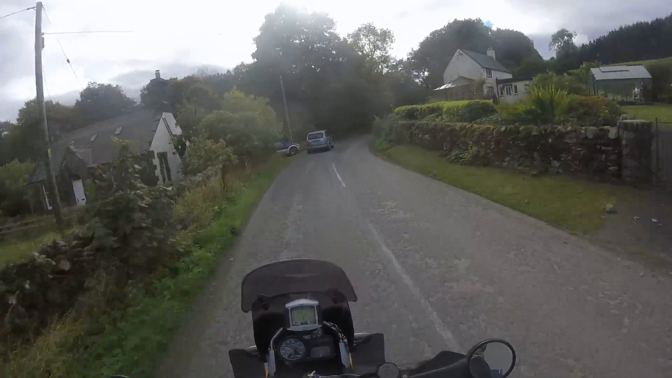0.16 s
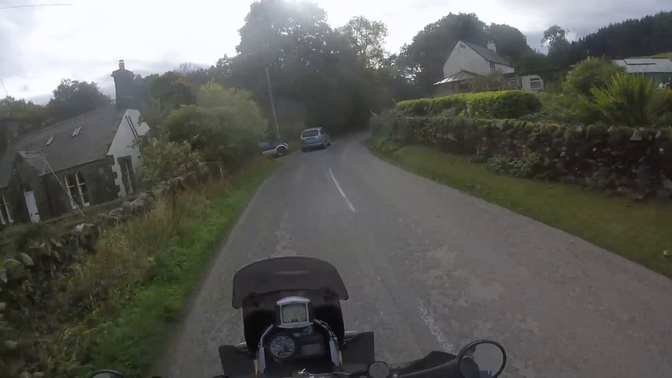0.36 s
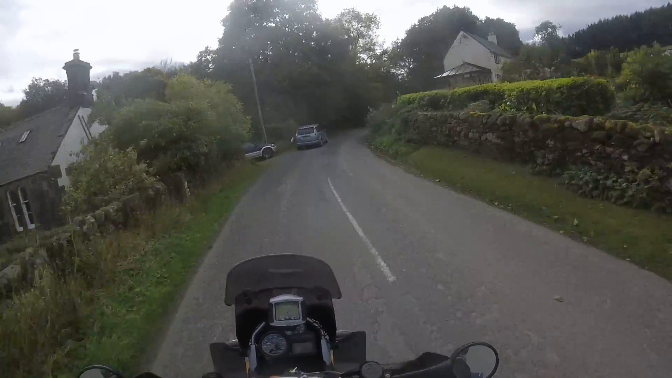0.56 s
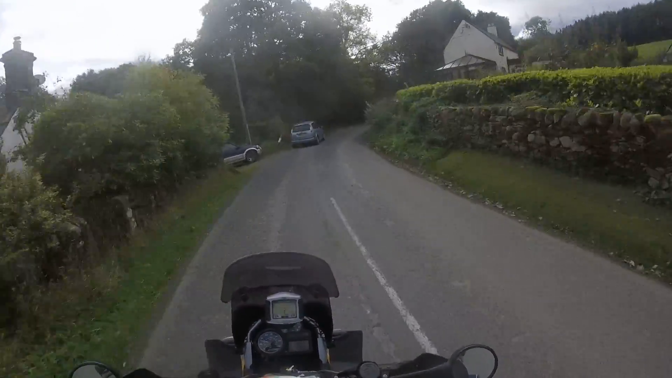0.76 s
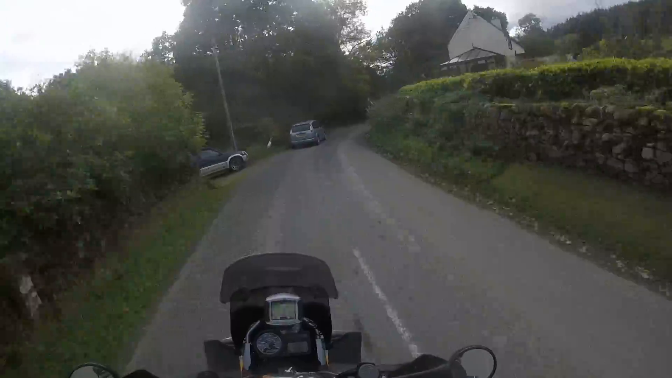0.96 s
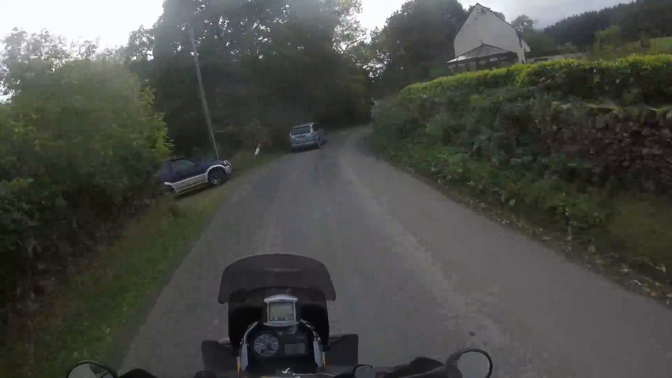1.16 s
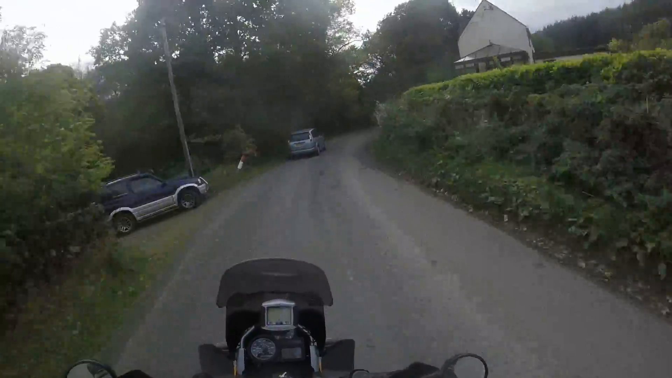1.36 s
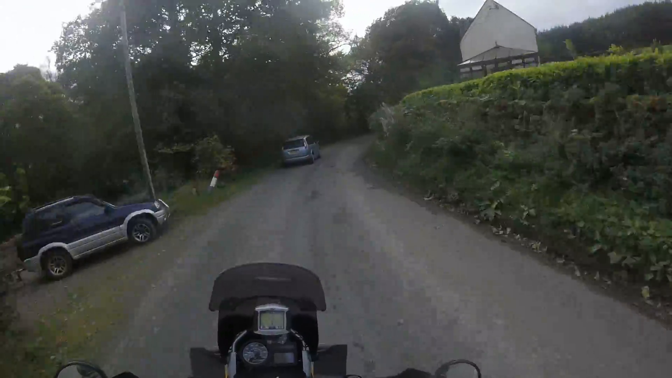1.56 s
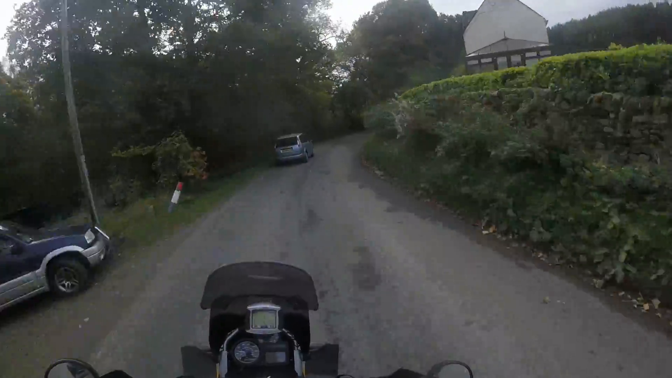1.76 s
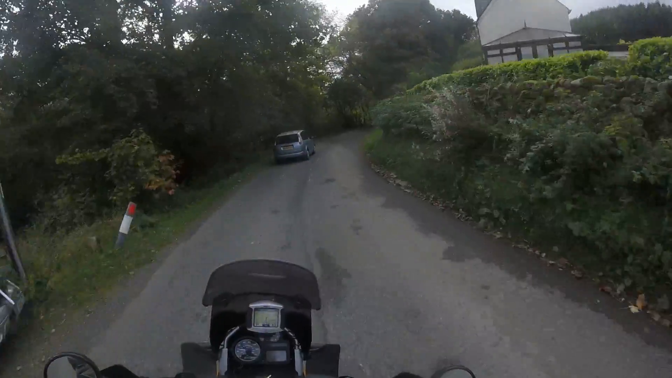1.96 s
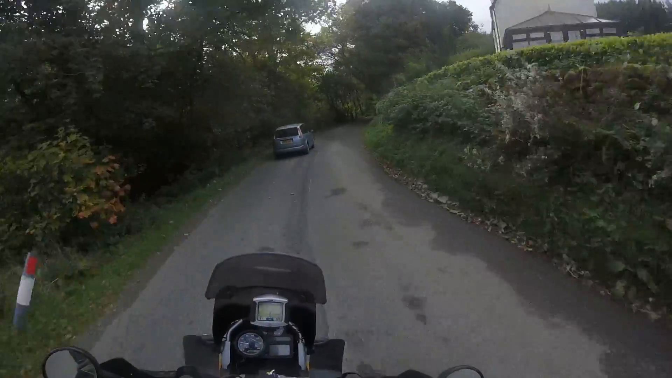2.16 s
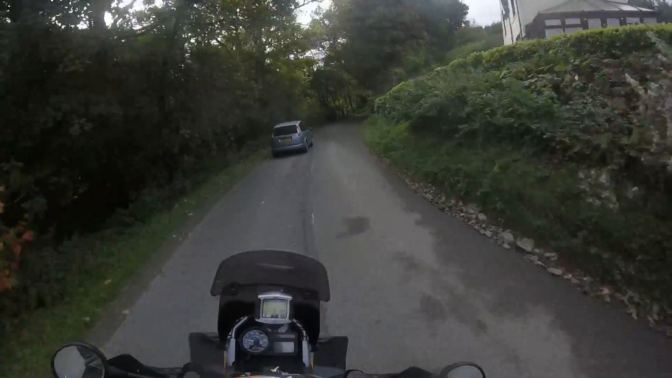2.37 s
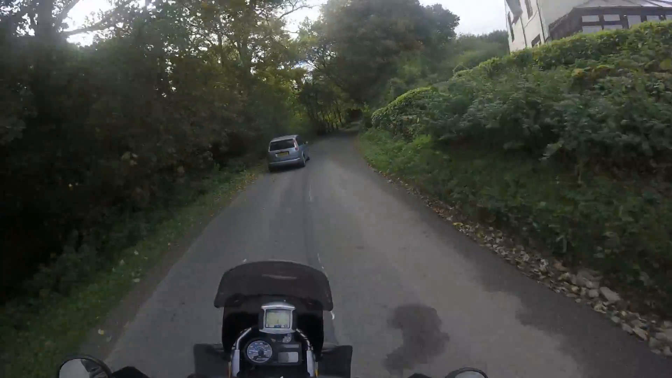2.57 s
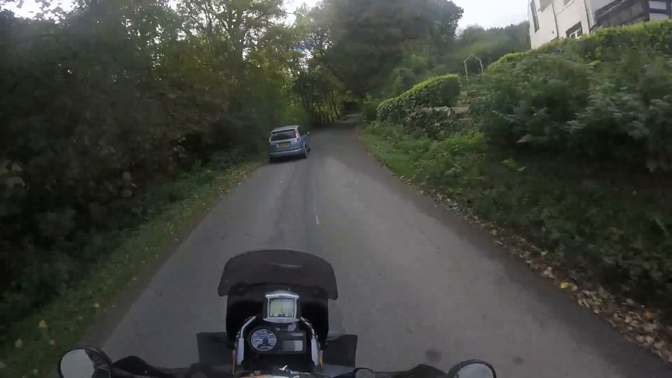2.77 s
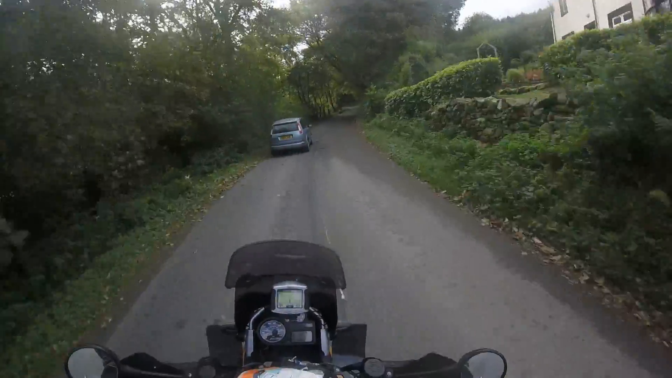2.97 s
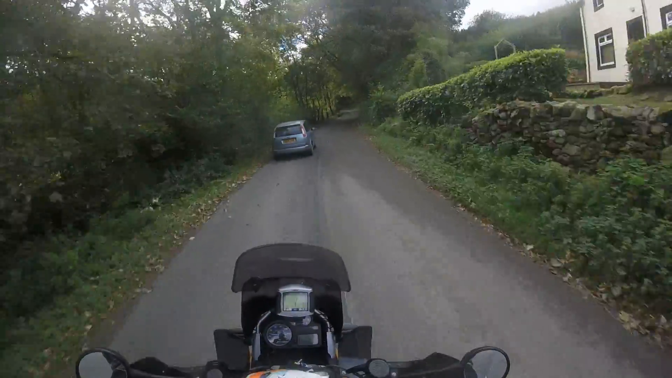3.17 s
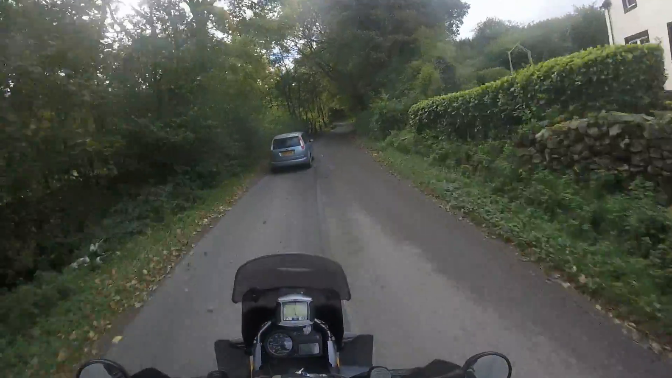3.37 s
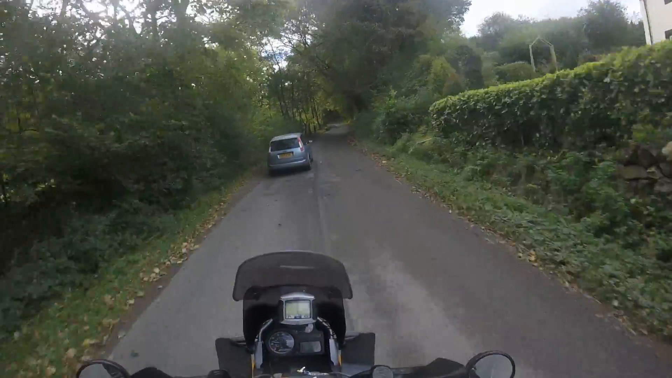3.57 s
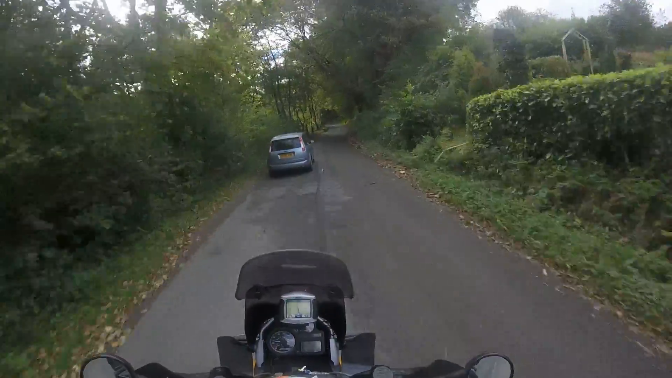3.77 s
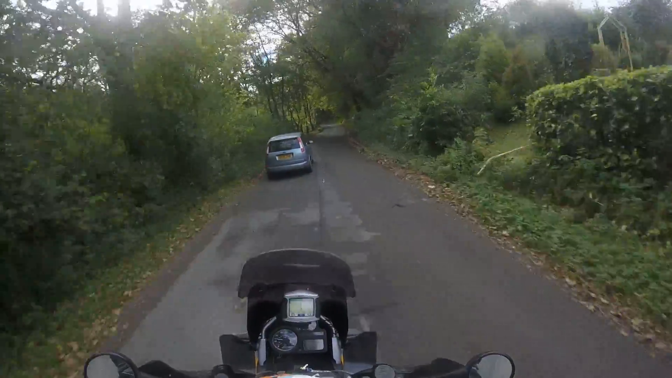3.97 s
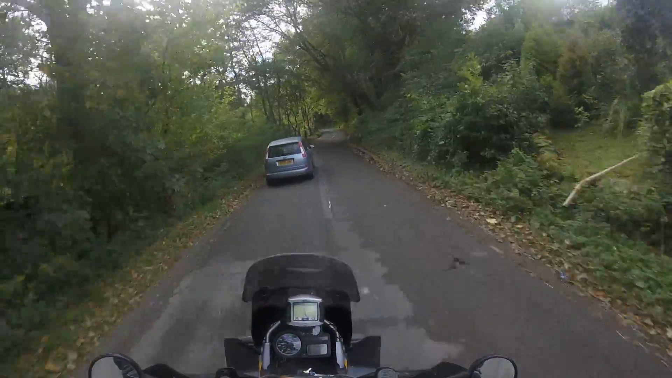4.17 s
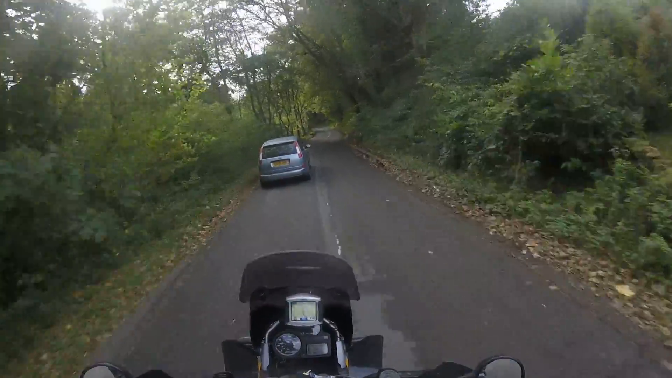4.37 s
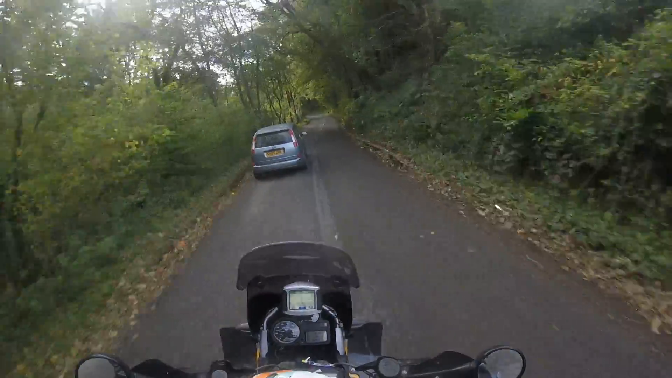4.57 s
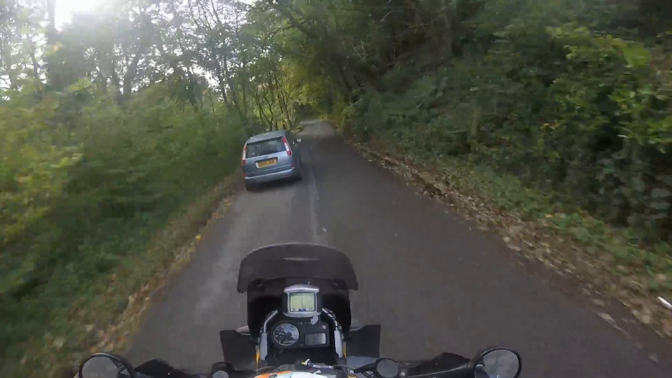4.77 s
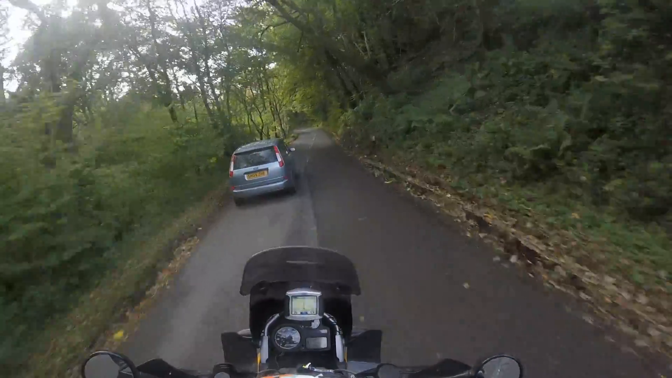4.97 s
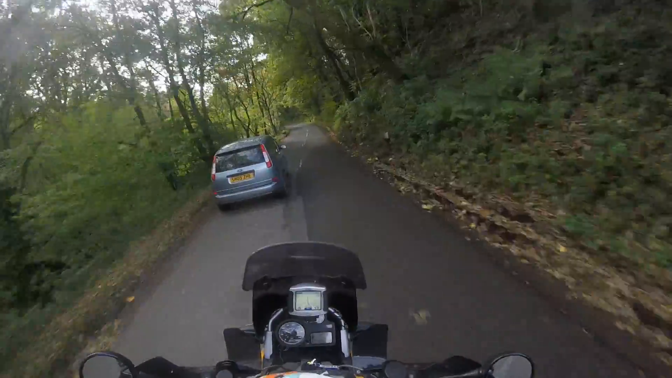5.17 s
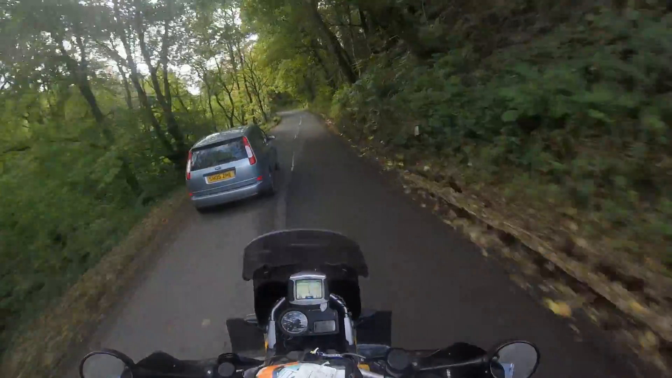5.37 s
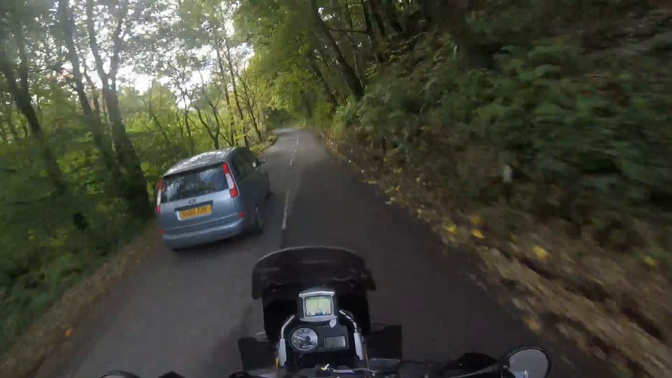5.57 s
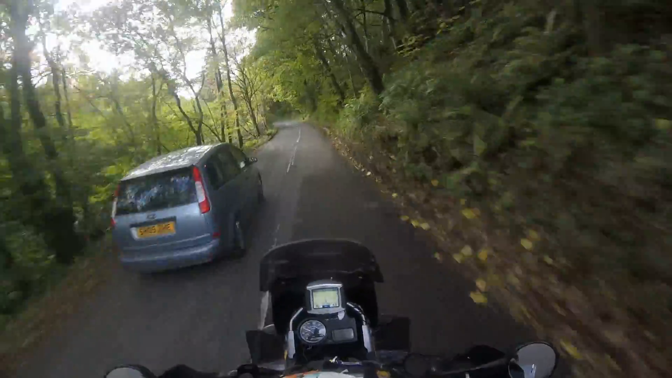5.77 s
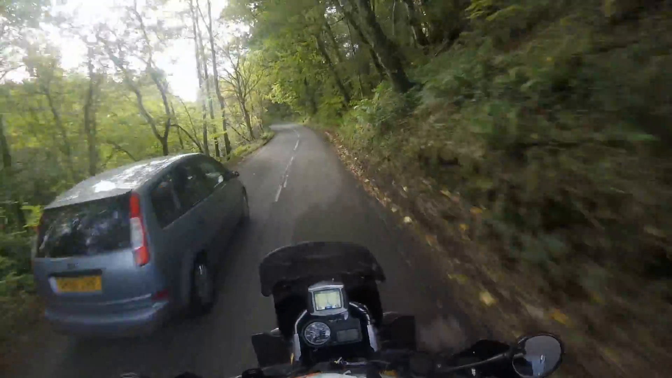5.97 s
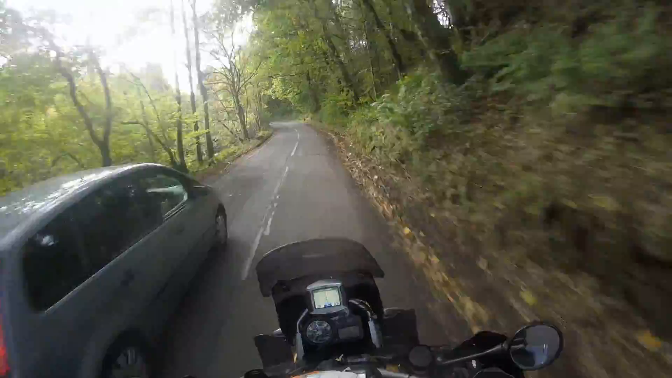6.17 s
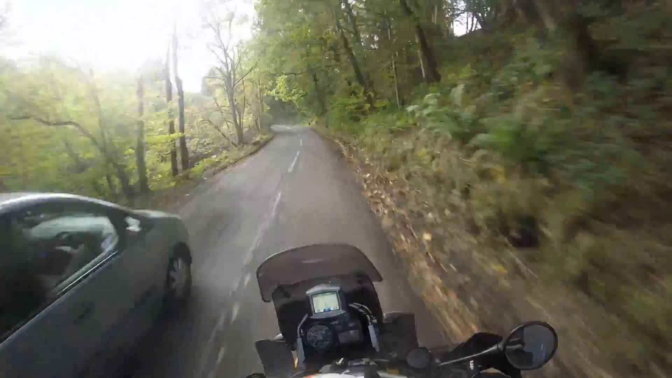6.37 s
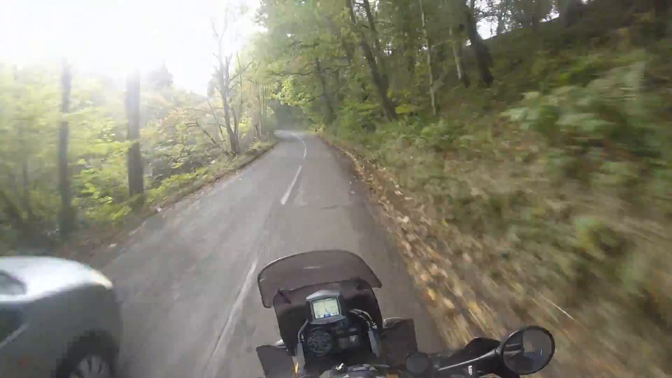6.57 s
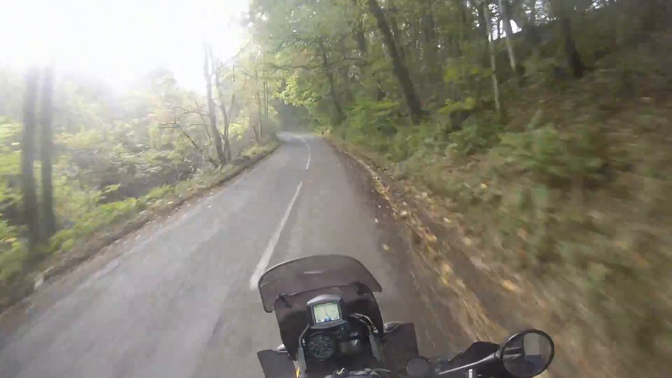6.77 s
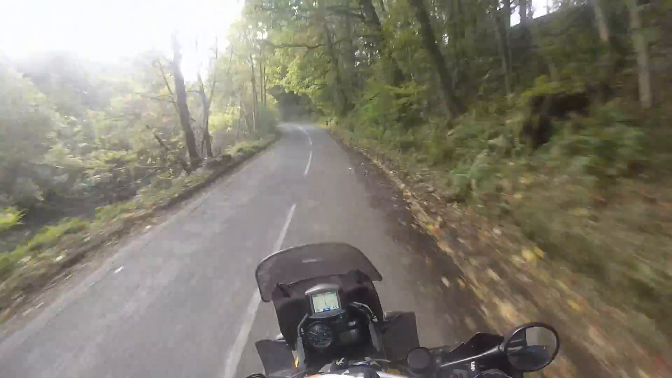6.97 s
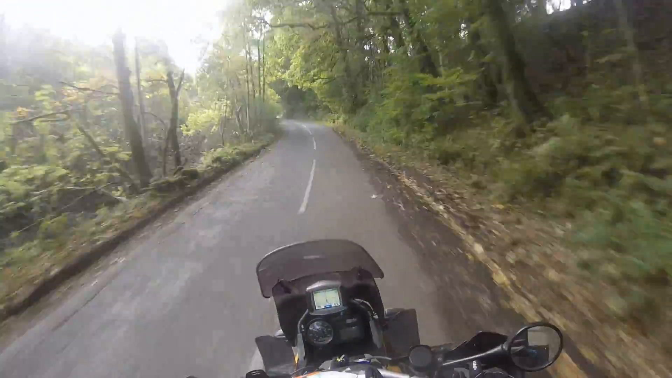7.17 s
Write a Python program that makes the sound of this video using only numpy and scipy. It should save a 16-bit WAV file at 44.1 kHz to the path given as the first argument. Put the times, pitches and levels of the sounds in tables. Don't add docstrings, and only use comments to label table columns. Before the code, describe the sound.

Fluttering wind roars and hisses over a helmet-mounted microphone as a twin-cylinder motorcycle eases off, then opens its throttle and speeds up in rising wind.

```python
import sys
import numpy as np
from scipy import signal
from scipy.fft import rfft, irfft, next_fast_len
from scipy.io import wavfile
from scipy.ndimage import map_coordinates

SR = 44100
rng = np.random.default_rng(int(sys.argv[2]) if len(sys.argv) > 2 else 0)


def voltage_ratio(level):
    return 10 ** (np.asarray(level, float) / 20)


def master(y):
    cut = np.clip(np.atleast_2d(y).T, -1, 1)
    pcm = np.round(cut * 32767)
    wavfile.write(sys.argv[1], SR, pcm.astype(np.int16))


N = 318843


def unit(x):
    return x / np.sqrt(np.mean(x ** 2) + 1e-20)


def along(points, hz):
    f, db = np.transpose(points)
    return voltage_ratio(np.interp(np.log(hz + 1), np.log(f + 1), db, left=-120, right=-120))


def peaks(modes, hz, steep):
    power = 0
    for center, width, db in modes:
        power = power + voltage_ratio(2 * db) / (1 + (2 * (hz - center) / width) ** 2) ** steep
    return np.sqrt(power)


def curves(rows):
    s, *columns = np.transpose(rows)
    return [np.interp(np.arange(N) / SR, s, column) for column in columns]


def wobble(rate):
    return map_coordinates(rng.standard_normal(8 * 400), [np.arange(N) * rate / SR])


def filtered(x, gain):
    m = next_fast_len(N + 8192)
    spectrum = rfft(x, m) * gain(np.fft.rfftfreq(m, 1 / SR))
    return irfft(spectrum, m)[:N]


def rush(flutter_db, gain):
    return unit(filtered(voltage_ratio(flutter_db) * rng.standard_normal(N), gain))


def bumps(rows):
    t = np.arange(N) / SR
    return sum(db * np.exp(-(2 * (t - s) / span) ** 2) for s, span, db in rows)


# (time [s], wind strength [dB], how squarely it hits the microphone port [dB])
WIND = [(0, -27, 0), (.12, -30.5, -0.5), (.68, -31, 0.5), (.76, -32.5, 0), (1.03, -34, 0.5),
        (1.1, -36, -0.5), (1.53, -40, 0), (2.48, -38.5, -2), (3.36, -40.5, -0.5), (3.5, -38.5, 0),
        (4.15, -38.5, 0), (4.55, -34.5, 0), (4.68, -33.5, 3), (5.2, -30.5, 0.5), (5.84, -27.5, 1.5),
        (6.4, -24, -1), (6.9, -24.5, 1.5), (7.23, -23, 0.5)]
LAYERS = {"roar": (0.59, 0.96), "door": (-15, 0.84), "hiss": (-24.5, 1.257), "boom": (-5.5, 0.91),
          "thud": (-5.5, 0.75), "rumble": (-11.5, 0.82)}


def layer_db(name):
    calm_db = -38
    strength_db = curves(WIND)[0]
    db, grows = LAYERS[name]
    return calm_db + db + grows * (strength_db - calm_db)


# (frequency [Hz], width [Hz], level [dB])
SHELL = [(955, 120, -25), (2103, 152, -0.5), (2375, 76, -5.5), (2625, 130, -1.5), (2743, 158, -2.5),
         (2873, 168, -1.5), (3190, 76, -19), (3590, 260, -19.5), (4055, 370, -19.5), (4810, 230, -27.5)]
# (frequency [Hz], level [dB per Hz])
ROAR = [(700, -28.5), (1200, -27.5), (1700, -33), (1950, -11), (2450, -10.5), (3300, -22), (4400, -25),
        (5300, -37.5), (7000, -32), (9000, -80)]


def shell_roar(eddies, spits, gust_db):
    roar = rush(0.67 * eddies + 0.6 * spits,
                lambda hz: np.hypot(peaks(SHELL, hz, steep=1.66), along(ROAR, hz)))
    return voltage_ratio(layer_db("roar") + gust_db) * roar


# (frequency [Hz], width [Hz], level [dB])
DOOR = [(1526, 95, -2.5), (1424, 220, -11.5)]
# (time [s], length [s], level [dB])
RINGS = [(.4, .06, 2), (.97, 0.055, 5), (1.15, 0.044, -1), (2.9, 0.09, -1), (3.68, 0.11, 4),
         (3.99, 0.068, 4.5), (4.66, 0.27, 6), (5.13, 0.065, 4), (5.32, 0.11, 1), (5.7, .1, 4.5),
         (6.74, 0.094, 5.5)]


def door_ring(eddies, gust_db):
    door = rush(1.1 * eddies, lambda hz: peaks(DOOR, hz, steep=1.51))
    return voltage_ratio(layer_db("door") + bumps(RINGS) + 0.4 * gust_db + 1.2 * wobble(9.1)) * door


# (time [s], level [dB])
TEARS = [(0.0494, -45), (0.0994, -40), (0.162, -41), (0.1994, -41), (0.2578, -37), (0.2932, -37),
         (0.3935, -37), (0.4683, -44), (0.6374, -40), (0.7881, -40), (0.8724, -41), (0.9213, -41),
         (1.0194, -53), (2.7721, -51), (2.9382, -56), (4.3236, -49), (4.4194, -54), (4.5042, -47),
         (4.6494, -44), (5.0833, -44), (5.2824, -43), (5.4789, -45), (5.7798, -39), (6.0921, -39),
         (6.5819, -33), (6.6942, -33), (6.8199, -33), (6.9396, -30), (7.0045, -31), (7.1626, -37)]


def tears_db(hiss_db):
    length, average_db, share = 0.015, 3, 0.73
    over = [db - hiss_db[round(s * SR)] for s, db in TEARS]
    mean = np.mean(over)
    rows = []
    for (s, _), excess in zip(TEARS, over):
        lift_db = max(average_db + share * (excess - mean), 0)
        rows.append((s + length / 2, length, lift_db))
    return bumps(rows)


# (frequency [Hz], width [Hz], level [dB])
CAVITY = [(5880, 330, 3), (6330, 640, -1.5), (7950, 250, -35.5), (9000, 1070, -4)]
# (frequency [Hz], level [dB per Hz])
HISS = [(4500, -40), (5400, -34.5), (7300, -9), (10000, -11), (11500, -18.5), (13000, -23), (15300, -40)]


def cavity_hiss(eddies, spits, gust_db):
    hiss = rush(0.69 * eddies + 0.17 * wobble(45) + 1.9 * spits,
                lambda hz: np.hypot(peaks(CAVITY, hz, steep=2.3), along(HISS, hz)))
    hiss_db = layer_db("hiss") + curves(WIND)[1]
    return voltage_ratio(hiss_db + tears_db(hiss_db) + 0.87 * gust_db + 0.66 * wobble(8.7)) * hiss


# (time [s], length [s], level [dB])
GUSTS = [(.04, 0.11, 3), (.26, .05, 3), (.68, 0.067, 0.5), (.78, 0.015, -12), (.99, 0.071, 0.5),
         (2.09, 0.069, 3.5), (2.6, 0.063, 1.5), (2.95, 0.032, 3), (3.54, .08, -0.5), (4.2, 0.016, -8),
         (.49, 0.018, 0), (1.76, 0.016, 1.5), (2.25, .02, 2), (2.68, 0.045, -3), (4.83, 0.11, 1.5),
         (5.21, 0.033, 3.5), (5.38, 0.082, 2), (6.91, 0.037, 2), (7.01, .05, 1)]


def wind():
    eddies = 0.41 * wobble(40) + 1.39 * wobble(90)
    spits = np.abs(wobble(300)) ** 1.23
    gust_db = bumps(GUSTS) + 0.46 * wobble(20)
    return (shell_roar(eddies, spits, gust_db) + door_ring(eddies, gust_db)
            + cavity_hiss(eddies, spits, gust_db))


# (frequency [Hz], width [Hz], level [dB])
HELMET = [(121.3, 14.6, -1), (101.5, 32, -8)]
# (time [s], length [s], level [dB])
BOOMS = [(.05, 0.17, 9), (.42, 0.072, -6), (.64, 0.23, 3.5), (.78, 0.089, -12), (2.05, 0.22, 6),
         (2.33, 0.092, -22), (2.4, .1, 7), (2.94, 0.13, 4), (3.5, .12, 7), (3.6, 0.086, -16),
         (4.21, 0.064, 4), (4.45, 0.12, 9), (4.63, .12, 3), (4.82, 0.093, -18), (5.25, .1, -0.5),
         (5.37, .06, 6.5), (5.97, 0.095, 8.5), (6.24, 0.059, 4), (6.31, 0.064, -10), (6.38, 0.055, -4),
         (6.46, 0.1, -16), (6.56, 0.11, 1.5), (6.76, 0.13, 4), (6.99, 0.079, 4), (7.06, 0.08, -9),
         (7.17, .1, 7)]


def helmet_boom(lumps):
    boom = rush(0.5 * lumps, lambda hz: peaks(HELMET, hz, steep=1.83))
    return voltage_ratio(layer_db("boom") + bumps(BOOMS)) * boom


# (frequency [Hz], level [dB per Hz])
THUD_COLOUR = [(4, -21), (15, 2), (30, 2), (55, -1.5), (85, -1), (105, 1), (150, -6), (170, -19),
               (260, -12.5), (330, -46)]
# (time [s], level [dB])
THUDS = [(.38, 6.5), (.64, -5), (.78, 7), (1.73, 5), (2.33, 1), (3.79, 9.5), (4.21, 8.5), (4.51, 5),
         (4.77, 6), (5.38, 10), (5.76, 2), (6.3, 1), (6.56, 5), (6.99, 9), (7.17, 4)]


def helmet_thud(lumps):
    thud = rush(0.66 * lumps + 0.27 * wobble(35), lambda hz: along(THUD_COLOUR, hz))
    length = 0.085
    thuds_db = bumps([(s, length, db) for s, db in THUDS])
    return voltage_ratio(layer_db("thud") + thuds_db) * thud


# (frequency [Hz], level [dB per Hz])
RUMBLE = [(100, -19), (170, -3.5), (286, -2), (345, -6.5), (505, -6.5), (669, -14.5), (957, -18),
          (1090, -22), (1300, -17), (1690, -14), (2860, -120)]


def road_rumble(lumps):
    rumble = rush(0.79 * lumps + 1.0 * wobble(40), lambda hz: along(RUMBLE, hz))
    return voltage_ratio(layer_db("rumble")) * rumble


def buffet():
    lumps = wobble(24)
    return helmet_boom(lumps) + helmet_thud(lumps) + road_rumble(lumps)


# (frequency [Hz], width [Hz], level [dB])
SILENCER = (97, 35, 0)
# (frequency [Hz], width [Hz], level [dB])
PIPE = [(284, 34, 0), (482, 60, -2)]


def exhaust_gain(hz):
    leak_db = -16.5 - 4 * np.log2(hz / SILENCER[0])
    chamber = peaks([SILENCER], hz, steep=1.7)
    low_pipe = peaks(PIPE[:1], hz, steep=0.9)
    high_pipe = peaks(PIPE[1:], hz, steep=2.2)
    return np.sqrt(chamber ** 2 + low_pipe ** 2 + high_pipe ** 2 + voltage_ratio(2 * leak_db))


# (time [s], crank turns [per s])
CRANK = [(0, 39.2), (.5, 37.8), (1, 35.5), (1.5, 33.4), (2, 32), (2.5, 31.3), (3, 31.2), (3.5, 32),
         (4, 33.4), (4.5, 35), (5, 37.8), (5.5, 41), (6, 43.8), (6.5, 46.3), (6.9, 48.5), (7.23, 50.3)]
# (time [s], load [-1 braking to 1 full throttle])
LOAD = [(0, 0.4), (.45, 0.32), (.9, -1), (1.6, -.9), (2.2, -.4), (2.6, 0.28), (3.3, 0.2), (3.8, 0.56),
        (4.4, 0.26), (4.7, 0.78), (5.4, 1.18), (6.3, 0.85), (7.23, 0.75)]
ORDERS = {2: (-40, 6, 1), 3: (-50, 14, -4), 4: (-56, 6, 0), 5: (-54, 20, 0), 6: (-47, 4, 2),
          7: (-56, 12, 10), 8: (-64, 8, 1), 9: (-62, 4, 0), 10: (-66, 12, 0), 11: (-62, 15, 0),
          12: (-61, 15, 0), 13: (-62, 15, 0), 14: (-70, 15, 0)}


def engine():
    (turns,), (load,) = curves(CRANK), curves(LOAD)
    angle = 2 * np.pi * np.cumsum(turns * (1 + 0.0014 * wobble(12))) / SR
    throttle = np.clip(load, 0, 1)
    braking = np.clip(-load, 0, 1)
    tones = np.zeros(N)
    for k, (db, pull_db, brake_db) in ORDERS.items():
        level = voltage_ratio(db + pull_db * throttle + brake_db * braking)
        waver = voltage_ratio(3.5 + wobble(6))
        tone = np.sin(k * angle + rng.uniform(0, 2 * np.pi))
        tones += level * exhaust_gain(k * turns) * waver * tone
    rasp = rush(3 * np.cos(angle), lambda hz: peaks(PIPE, hz, steep=1.6))
    return tones + voltage_ratio(-69 + 18 * throttle) * rasp


# (frequency [Hz], level [dB per Hz])
SELF_NOISE = [(3000, -18), (8000, 15), (12000, -6), (14500, -3), (15300, -14)]


def self_noise():
    return voltage_ratio(-71) * rush(0, lambda hz: along(SELF_NOISE, hz))


# (time [s], length [s], level [dB])
JETS = [
    (1.432, .04, -59),
    (2.038, .015, -72),
]
# (frequency [Hz], level [dB per Hz])
JET = [(4000, -20), (6500, 6), (11000, -2), (15000, -12)]


def jets():
    t = np.arange(N) / SR
    shape = np.zeros(N)
    for s, span, db in JETS:
        shape += voltage_ratio(db) * np.interp(t - s, [0, 0.003, 0.97 * span, span], [0, 1, 1, 0])
    return shape * rush(2.2 * wobble(200), lambda hz: along(JET, hz))


def scene():
    return (wind() + buffet() + engine() + self_noise() + jets())[None]


def top_cut(x):
    return signal.sosfilt(signal.butter(12, 15220, fs=SR, output="sos"), x)


def record(dry):
    return top_cut(dry)


dry = scene()
out = record(dry)
master(out)
```